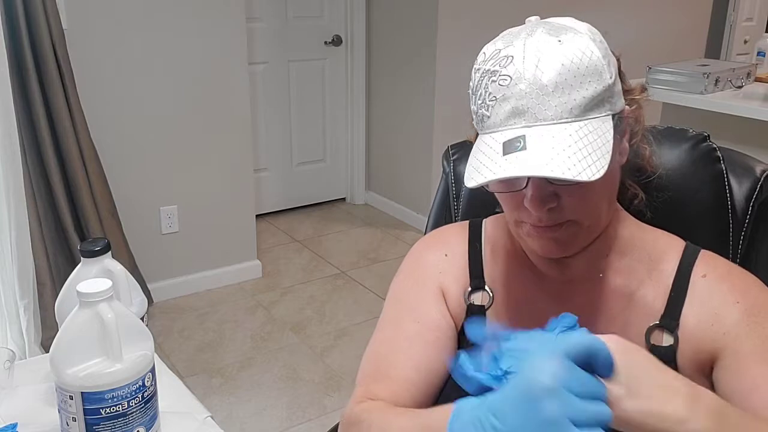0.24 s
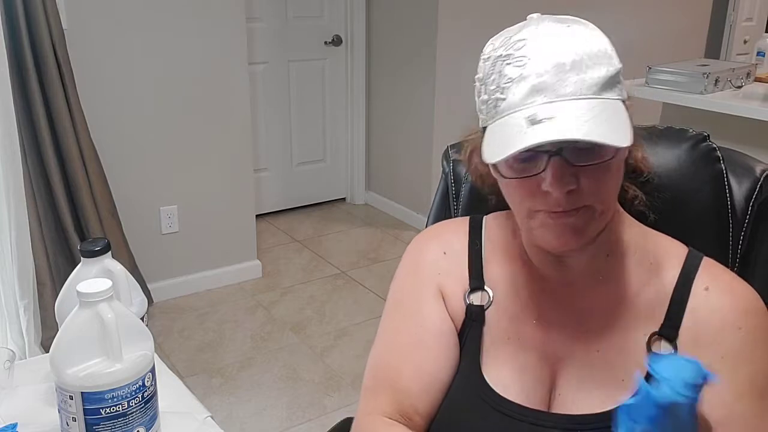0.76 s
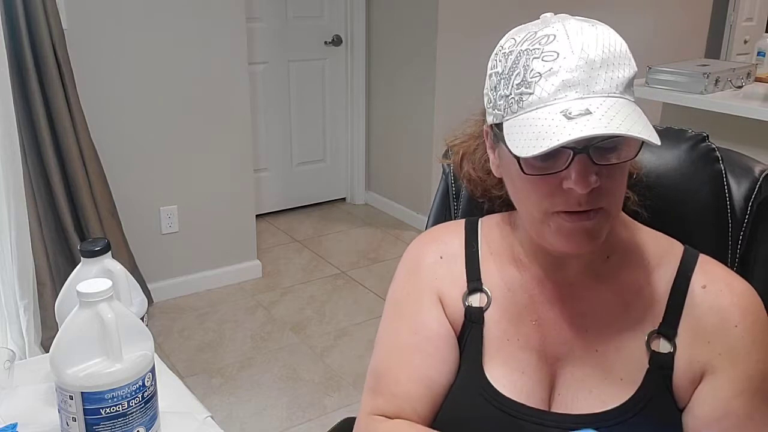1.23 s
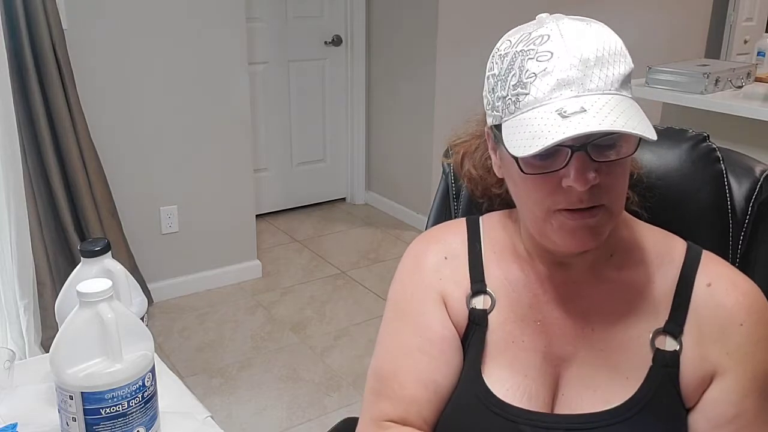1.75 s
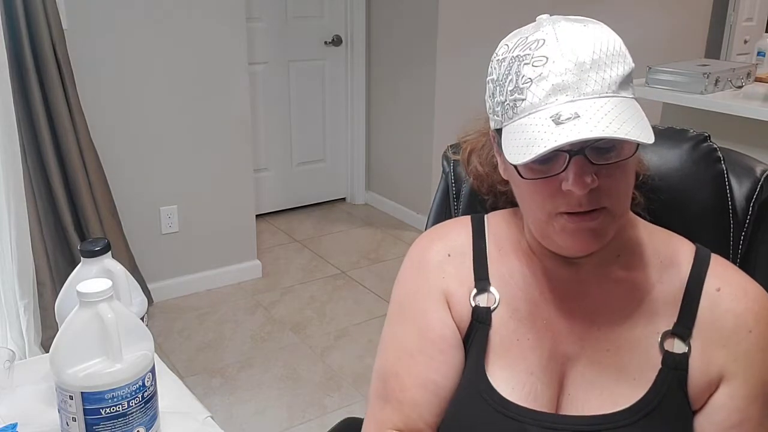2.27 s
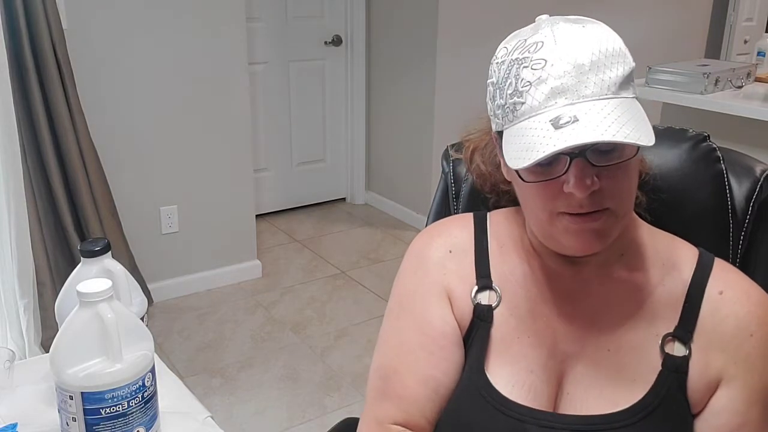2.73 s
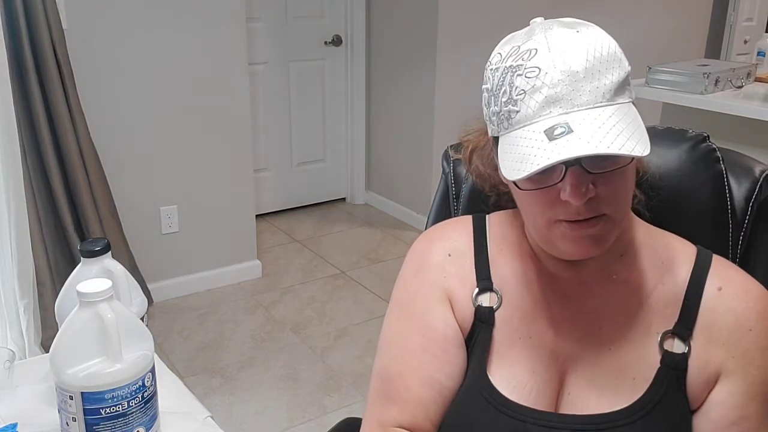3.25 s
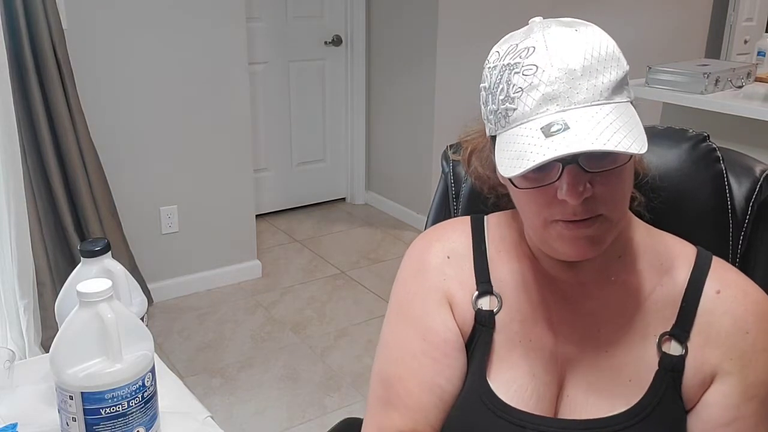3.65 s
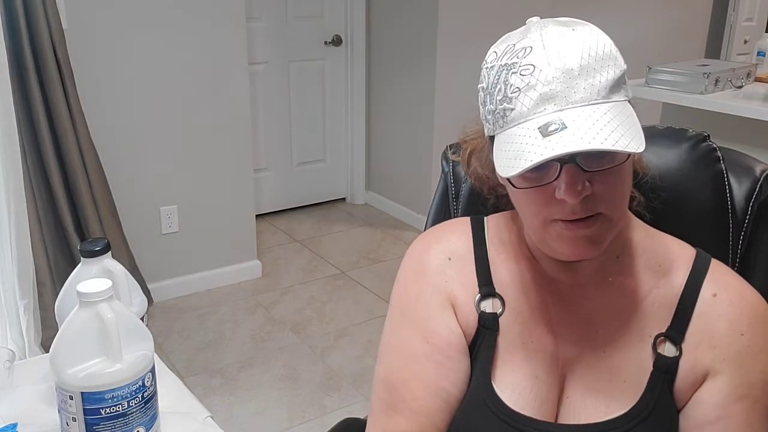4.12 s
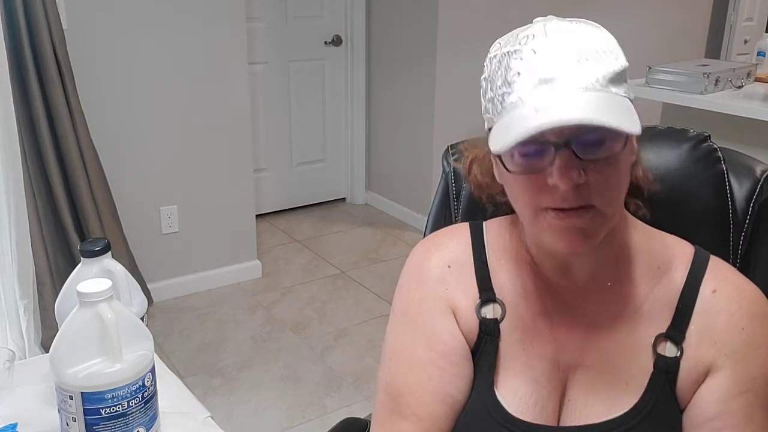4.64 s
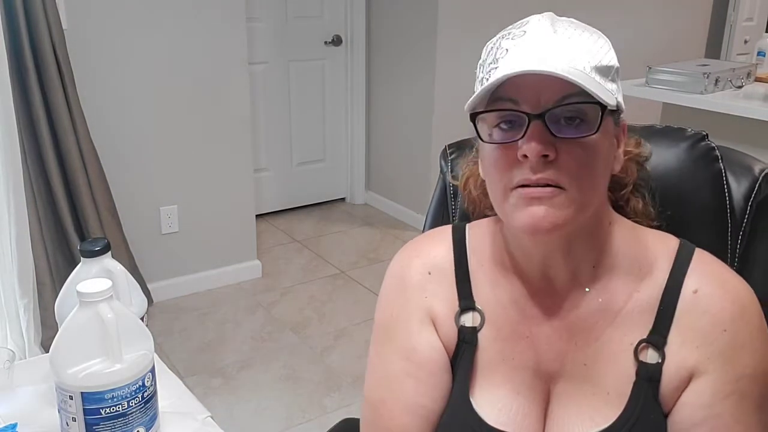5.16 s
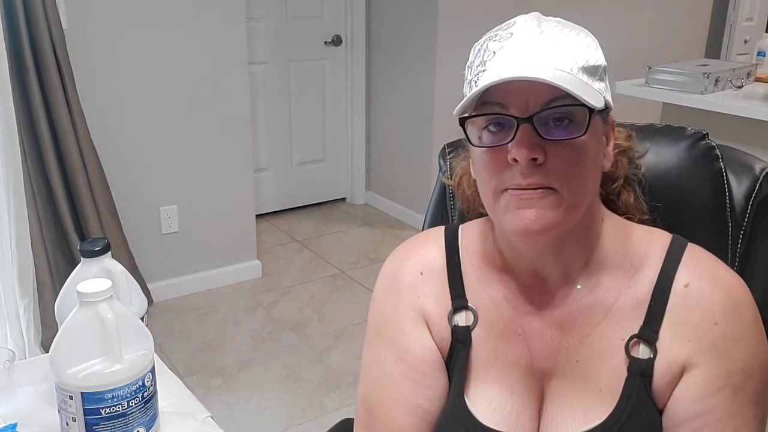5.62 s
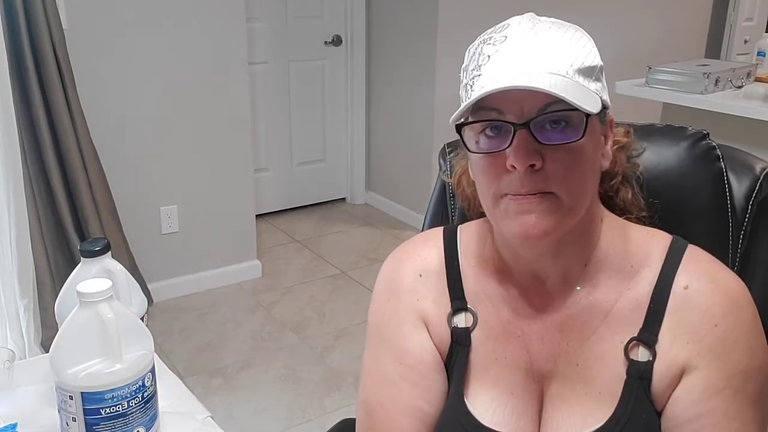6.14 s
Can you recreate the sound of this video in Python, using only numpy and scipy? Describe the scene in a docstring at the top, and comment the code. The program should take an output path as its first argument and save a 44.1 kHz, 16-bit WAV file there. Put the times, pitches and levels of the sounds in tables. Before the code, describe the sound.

Thin rubber gloves snap, crinkle and rub against skin in a quiet, slightly echoing tiled room, with a low motor hum growing behind.

```python
"""Rubber snaps on skin: thin gloves are worked onto the hands in a quiet room with a tiled floor.
Snaps are noise bursts ringing the film and the air under it; between them slips drive gliding resonances,
folds tick, narrow bands groan, a fingertip squeaks and the hands bump. Decaying noise makes the echoes.
Behind it, sines make a motor beyond the walls that mostly drops in pitch; noise makes air hiss and rumble."""
import sys
import numpy as np
from scipy import signal
from scipy.fft import rfft, irfft, next_fast_len
from scipy.io import wavfile

SR = 44100
rng = np.random.default_rng(int(sys.argv[2]) if len(sys.argv) > 2 else 0)


def dump(signal):
    """Clip the signal to [-1, 1] and save it as 16-bit WAV at the path in sys.argv[1]."""
    limited = np.clip(np.atleast_2d(signal).T, -1, 1)
    pcm = np.round(limited * 32767).astype(np.int16)
    wavfile.write(sys.argv[1], SR, pcm)


N = 281482
TIME = np.arange(N) / SR

# spectrum of the rubber film, only its shape counts: (frequency [Hz], density [dB per Hz])
FILM_SPECTRUM = [(500, -9.5), (900, -11.5), (1400, 4.5), (2200, -2), (3200, 2), (4800, 0.5), (6200, -6.5),
                 (9000, -13.5)]
# spectrum of cracks and crinkling folds, only its shape counts: (frequency [Hz], density [dB per Hz])
CRINKLE_SPECTRUM = [(3000, -15.5), (5200, -2), (6800, 4), (8600, 0), (10200, 3.5), (11600, 6), (13000, 3),
                    (14500, -2)]


def snaps(peel_db, peel_stretch, pocket_octaves, film_octaves, slap_db):
    """The film peels off, slaps down and settles; returns the direct sound and what goes into the room."""
    # rubber snapping on skin, levels are rms over 40 ms: (time [s], air pocket [dB], film [dB], crack [dB],
    # air pocket pitch [Hz], film pitch [Hz], room send [dB])
    snap_table = [(0.2923, -52, -45.5, -45.5, 920, 2730, -0.5), (0.347, -51, -50, -50, 730, 2500, -2),
                  (0.7535, -75, -48, -45.5, 1000, 4100, -4.5), (0.76, -65, -53, -52, 940, 3970, -6),
                  (0.7889, -63, -48.5, -40.5, 700, 3830, 2), (1.255, -95, -75.5, -64.5, 735, 2600, 0),
                  (1.3833, -83, -62, -52, 480, 2500, -9), (1.4425, -68, -58, -72, 900, 1920, -2),
                  (1.7519, -60.5, -56.5, -86, 634, 1730, -3.5), (1.9756, -79, -69.5, -87, 640, 1850, 3),
                  (2.1654, -68, -66, -76, 475, 1600, 0.5), (2.3569, -69, -58, -85, 580, 2290, -8),
                  (2.3679, -69, -61, -86, 650, 2630, -6), (2.376, -65.5, -58, -85, 577, 2340, -5),
                  (2.5235, -75, -67, -56, 710, 3370, -4), (2.9893, -45.5, -41.5, -42.5, 460, 2740, -9),
                  (3.1741, -76, -56.5, -72, 610, 3100, -12), (3.2581, -64, -60.5, -67, 890, 2570, 0),
                  (3.2637, -61, -58, -64, 970, 2550, -2), (3.297, -55, -61, -70, 810, 1600, -11),
                  (3.3302, -61, -60, -69, 600, 1980, -7), (3.4963, -52, -57, -74, 790, 1560, -1),
                  (3.5671, -48.5, -46.5, -49, 750, 1700, -3.5), (3.6641, -50, -55, -73, 735, 1760, -8),
                  (3.7099, -63, -46, -57, 468, 1430, -15), (3.724, -52.5, -46.5, -64, 462, 3130, 0),
                  (3.978, -76, -56, -68, 520, 4500, -3), (4.0101, -60, -50.5, -70, 789, 3460, -15),
                  (4.0657, -52, -60, -77.5, 806, 1867, -6), (4.212, -51, -48, -65, 650, 4000, -2),
                  (4.2433, -48, -44.5, -55, 470, 3600, -6.5), (4.4442, -69, -63.5, -55.5, 645, 2370, -4),
                  (4.5903, -52.5, -51, -58, 670, 2290, -5), (4.597, -54, -51.5, -84, 668, 3560, -2),
                  (4.8959, -64, -62.5, -64, 735, 2450, -14), (5.0119, -60.5, -67.5, -67, 836, 1510, -6),
                  (5.1836, -71, -62.5, -74, 880, 4600, -21), (5.198, -70, -58.5, -65, 850, 4770, -21),
                  (5.3322, -63, -63, -78, 930, 1900, -17), (5.4674, -49, -47.5, -56, 720, 4120, -6),
                  (5.6601, -72, -59, -73, 430, 1640, -8)]
    rise_steepness = 2.3  # a snap rises this many times faster than it falls
    decay_cycles = 2.1  # film cycles to fall to 1/e: the higher the pitch, the shorter
    lead_s = .008  # room for the rise ahead of the slap
    direct, sent = np.zeros(N), np.zeros(N)
    t = np.arange(SR // 25) / SR - lead_s
    from_slap = np.where(t < 0, -rise_steepness * t, t)
    click = signal.unit_impulse(len(t), int(lead_s * SR))
    for s, pocket_db, film_db, crack_db, pocket_hz, film_hz, room_db in snap_table:
        age = from_slap * film_hz / decay_cycles
        slap = np.exp(-age)
        peel = from_db(peel_db) * np.exp(-age / peel_stretch)
        # the crack comes mostly from the slap itself
        envelopes = [slap + peel, slap + peel / 2, slap + peel / 10]
        burst = rng.standard_normal((3, len(t))) * envelopes
        # the room gathers all directions, so the ragged burst reaches it as an even click
        routes = (direct, burst, 1), (sent, [click] * 3, from_db(room_db))
        for out, (low, mid, high), gain in routes:
            late_slap = coloured(np.roll(mid, SR // 4000), FILM_SPECTRUM)  # about 0.25 ms late
            ring = resonance(mid, film_hz, film_octaves)
            film = rms_one(ring + from_db(slap_db) * late_slap)
            snap = (from_db(pocket_db) * resonance(low, pocket_hz, pocket_octaves)
                    + from_db(film_db) * film
                    + from_db(crack_db) * coloured(high, CRINKLE_SPECTRUM))
            add(out, s - lead_s, gain * snap)
    return direct, sent


def rubbing(hollow_octaves, stretch_octaves, hand_db, scuff_db, sliding):
    """Slips drive the air pocket and the film together; tiny folds tick on top."""
    # spectrum of the hand's rub, only its shape counts: (frequency [Hz], density [dB per Hz])
    hand_spectrum = [(130, -59), (230, -15), (340, -0.5), (600, -3), (850, -1.5), (1300, -8), (2500, -30)]
    pocket_gain, film_gain, crinkle_gain, pocket_hz, film_hz = pulls()
    # smooth sliding fills the gaps between the slips
    drive = sliding + slips(per_s=115, unevenness=.45, spread_db=2.5, slip_ms=2.43)
    # the air pocket's pitch moves from pull to pull
    hand = coloured(drive * rng.standard_normal(N), hand_spectrum)
    hollow = rms_one(gliding(drive, pocket_hz, hollow_octaves) + from_db(hand_db) * hand)
    # so does the film's ringing pitch
    scuff = coloured(drive * rng.standard_normal(N), FILM_SPECTRUM)
    film = rms_one(gliding(drive, film_hz, stretch_octaves) + from_db(scuff_db) * scuff)
    crinkle = coloured(grains(per_s=2300, spread_db=3.5), CRINKLE_SPECTRUM)
    return pocket_gain * hollow + film_gain * film + crinkle_gain * crinkle


def pulls():
    """Each pull swells and lets go; the strongest sets the pitches. Returns three gains and two pitches."""
    # pulls dragging the rubber over the skin, levels at the tightest moment before the bass is thinned:
    # (tightest moment [s], rise [s], fall [s], air pocket [dB], film [dB], crinkle [dB],
    # air pocket pitch [Hz], film pitch [Hz])
    pull_table = [(0.11, 0.14, 0.12, -73, -69, -69, 745, 2420),
                  (0.255, 0.06, 0.053, -68, -64.5, -65, 800, 2600),
                  (0.35, 0.056, .12, -53, -53, -53.5, 700, 2680),
                  (0.48, 0.084, 0.1, -63, -59.5, -63.5, 376, 2810),
                  (0.615, 0.017, 0.11, -65, -61.5, -64, 595, 3940),
                  (0.83, 0.077, 0.1, -65, -54.5, -46.5, 605, 4000),
                  (1.125, 0.052, .09, -83, -77, -72, 400, 4600),
                  (1.27, 0.032, 0.11, -95, -68.5, -66, 600, 4250),
                  (1.36, 0.058, 0.12, -76, -62.5, -63, 540, 3070),
                  (1.44, 0.044, 0.099, -60, -56.5, -63, 840, 1900),
                  (1.565, 0.13, 0.19, -62.5, -59.5, -76, 686, 1820),
                  (1.757, 0.024, 0.073, -58, -55.5, -73, 580, 1800),
                  (1.815, 0.043, 0.065, -63.5, -63.5, -65, 403, 1840),
                  (2.005, 0.033, 0.1, -65, -73, -77, 382, 1850),
                  (2.184, 0.051, 0.068, -58.5, -63, -66, 453, 1537),
                  (2.39, .15, 0.11, -58.5, -58, -63, 575, 2500),
                  (2.487, 0.016, 0.018, -56.5, -53, -63, 630, 2750),
                  (2.602, 0.027, 0.11, -58, -54, -67.5, 790, 1780),
                  (2.725, 0.095, 0.21, -61.5, -59.5, -62.5, 548, 1940),
                  (2.977, 0.11, 0.11, -45, -48, -70, 635, 1650),
                  (3.025, 0.055, 0.039, -54, -49.5, -48, 640, 1600),
                  (3.14, 0.085, 0.058, -51.5, -51.5, -65, 590, 2290),
                  (3.33, 0.16, 0.089, -60.5, -63.5, -71, 556, 2070),
                  (3.46, 0.14, 0.071, -61, -62, -66.5, 720, 1970),
                  (3.518, 0.024, 0.19, -48, -49, -64, 780, 1600),
                  (3.72, 0.067, 0.029, -43.5, -41.5, -57, 464, 2170),
                  (3.88, 0.11, 0.059, -49.5, -53, -66, 534, 2030),
                  (4.02, 0.094, 0.15, -54, -55, -71, 640, 2570),
                  (4.22, 0.026, 0.062, -43.5, -51.5, -58, 527, 2900),
                  (4.28, 0.082, 0.082, -54.5, -52.5, -58, 366, 2250),
                  (4.44, 0.057, 0.061, -55, -57, -59, 506, 2310),
                  (4.56, 0.056, 0.14, -62, -59.5, -67.5, 595, 3360),
                  (4.795, 0.11, 0.043, -74, -60.5, -63, 720, 4200),
                  (4.93, 0.17, 0.18, -63, -63.5, -63.5, 698.3, 2370),
                  (5.21, 0.078, 0.21, -72.5, -61.5, -66.5, 830, 4740),
                  (5.315, 0.091, 0.071, -55.5, -59, -67, 844, 2130),
                  (5.424, 0.026, 0.025, -60, -64, -59.5, 650, 2600),
                  (5.5, 0.037, 0.21, -61.5, -57, -64.5, 900, 4600),
                  (5.67, 0.097, 0.11, -60, -61, -69.5, 380, 1720),
                  (5.9, 0.043, 0.14, -74.5, -66.5, -64, 740, 3870),
                  (5.989, 0.058, 0.061, -67.5, -72.5, -70, 698, 1690),
                  (6.205, 0.02, 0.25, -85, -70, -63, 600, 4270),
                  (6.253, 0.035, 0.091, -63.5, -67, -80, 610, 2260)]
    edge_db = -20.5  # level one rise before and one fall after the tightest moment
    roundness = 1.51  # 1 = pointed, 2 = rounded
    s, rise_s, fall_s, low_db, mid_db, high_db, pocket_hz, film_hz = np.transpose(pull_table)
    coarse = TIME[::44]  # a control value about every 1 ms
    since = coarse[:, None] - s
    age = np.maximum(-since / np.maximum(rise_s, .005), since / np.maximum(fall_s, .005))
    power = from_db(np.maximum(edge_db * age ** roundness, -200)) ** 2
    low, mid, high = [power * from_db(db) ** 2 for db in (low_db, mid_db, high_db)]
    gains = [np.sqrt(part.sum(axis=1)) for part in (low, mid, high)]
    # pitches averaged by power
    pitches = [part @ hz / part.sum(axis=1) for part, hz in ((low, pocket_hz), (mid, film_hz))]
    return [np.interp(TIME, coarse, control) for control in gains + pitches]


def thin(x, edge_hz):
    """A thin film radiates little bass."""
    return signal.sosfilt(signal.butter(4, edge_hz, "high", fs=SR, output="sos"), x)


def groans(width_hz, width_share, edge_db):
    """A run of slips rings one narrow resonance, sliding as the rubber moves; higher ones are damped more."""
    # tight rubber groaning as it slides, level at the loudest moment before the ends are faded:
    # (start [s], loudest [s], end [s], start pitch [Hz], end pitch [Hz], level [dB])
    groan_table = [(0.291, 0.304, 0.46, 895, 828, -51), (1.431, 1.453, 1.54, 2106, 1307, -60.5),
                   (1.521, 1.562, 1.61, 462, 498, -58.5), (1.591, 1.616, 1.73, 626, 573, -58),
                   (1.78, 1.81, 1.88, 473, 338, -56), (1.97, 1.98, 2.16, 1930, 1734, -66),
                   (2.16, 2.16, 2.25, 425, 464, -57), (2.37, 2.414, 2.49, 3030, 3250, -55.5),
                   (2.87, 2.976, 2.98, 777.4, 605.3, -41.5), (2.952, 2.975, 3.04, 499.4, 344.4, -42.5),
                   (3.377, 3.452, 3.56, 12600, 12500, -65), (3.86, 3.884, 3.94, 457, 425, -50.5),
                   (4.239, 4.28, 4.42, 326.3, 290.4, -53), (4.823, 4.866, 4.93, 636, 698, -56.5),
                   (5.161, 5.18, 5.3, 4970, 5460, -59.5), (6.226, 6.247, 6.31, 628, 606, -58.5)]
    out = np.zeros(N)
    drive = slips(per_s=100, unevenness=.3, spread_db=1.0, slip_ms=0.8)
    for start, loudest, end, start_hz, end_hz, db in groan_table:
        span = (TIME >= start) & (TIME < end)
        t = TIME[span]
        swell = from_db(db + np.interp(t, [start, loudest, end], [edge_db, 0, edge_db]))
        phase = 2 * np.pi * np.cumsum(np.geomspace(start_hz, end_hz, len(t))) / SR
        # slow noise on a gliding carrier is a gliding narrow band
        half_width_hz = max(width_hz, width_share * start_hz) / 2
        narrow = signal.butter(2, half_width_hz, fs=SR, output="sos")
        noise = drive[span] * rng.standard_normal((2, len(t)))
        cos_part, sin_part = signal.sosfilt(narrow, noise)
        band = rms_one(cos_part * np.cos(phase) + sin_part * np.sin(phase))
        out[span] += swell * signal.windows.tukey(len(t), 1 / 10) * band
    return out


def squeak(overtone_db, jitter):
    """A fingertip on the film slips very fast, nearly regularly: a short chirp with two overtones."""
    # one squeak, level before its fade in and out: (time [s], length [s], pitch [Hz], level [dB])
    squeak_settings = (1.378, .012, 2660, -43.0)
    s, length_s, hz, level_db = squeak_settings
    out, size = np.zeros(N), int(length_s * SR)
    phase = 2 * np.pi * np.cumsum(hz * (1 + jitter * drift(810)[:size])) / SR
    chirp = sum(from_db(overtone_db * k) * np.sin((k + 1) * phase) for k in range(3))
    add(out, s, from_db(level_db) * rms_one(chirp) * np.hanning(size))
    return out


def bumps(decay_s):
    """Soft, dull thuds of one hand on the other: bursts of low noise that die quickly."""
    # the hands bump together, level is rms over 1/8 s: (time [s], level [dB])
    bump_table = [(0.349, -63), (0.48, -66.5), (2.72, -67), (3.497, -63), (3.566, -62.5), (3.721, -47.5),
                  (4.065, -66), (4.24, -61.5), (4.589, -62.5), (4.894, -62), (5.317, -63.5), (5.66, -67)]
    # spectrum of a thud, only its shape counts: (frequency [Hz], density [dB per Hz])
    bump_spectrum = [(75, -14.5), (125, 0), (190, -1), (300, 0), (480, -23)]
    out, t = np.zeros(N), TIME[:SR // 8]
    for s, level_db in bump_table:
        burst = rng.standard_normal(len(t)) * np.exp(-t / decay_s)
        add(out, s, from_db(level_db) * coloured(burst, bump_spectrum))
    return out


def room(x, build_s, first_s, count=4):
    """The sound leaves ever different spots of the gloves, each with its own echoes."""
    spot = TIME * 100  # cycles through the spots, 100 a second
    out = np.zeros(N)
    for share in np.eye(count):
        from_spot = x * np.sqrt(np.interp(spot, np.arange(count), share, period=count))
        out += signal.fftconvolve(from_spot, room_tail(build_s, first_s))[:N]
    return out


def room_tail(build_s, first_s):
    """Diffuse echoes build up after the first reflection and die band by band; energy 1."""
    # the room's decay by 60 dB: (frequency [Hz], decay time [s])
    decay_times = [(150, 0.64), (400, 0.36), (900, 0.66), (3000, 0.56), (8000, 0.65), (13000, 0.4)]
    t, tail = TIME[:int(.8 * SR)], 0
    edges = np.geomspace(90, 16000, num=11)  # Hz
    for low, high in zip(edges, edges[1:]):
        band_pass = signal.butter(2, [low, high], "band", fs=SR, output="sos")
        band = signal.sosfilt(band_pass, rng.standard_normal(len(t)))
        tail = tail + band * from_db(-60 * t / at_hz(decay_times, np.sqrt(low * high)))
    tail = tail * (1 - np.exp(-np.maximum(t - first_s, 0) / build_s))
    return tail / np.linalg.norm(tail)


def motor(octave_db, waver_db):
    """A motor beyond the walls: a low hum with a faint octave, wavering at random in level."""
    # the hum's course, level of the fundamental before it wavers: (time [s], pitch [Hz], level [dB])
    motor_course = [(0, 104.7, -74.5), (1.55, 107.6, -74), (2.1, 104, -79.5), (2.85, 102.2, -70.5),
                    (3.0, 97.2, -70), (3.75, 97, -58.5), (4.3, 90.7, -65.5), (4.8, 89.6, -71.5),
                    (5.4, 88.3, -59), (5.75, 87.4, -65.5), (5.9, 84.2, -49), (6.02, 76.5, -53),
                    (6.38, 77.4, -51.5)]
    s, hz, db = np.transpose(motor_course)
    phase = 2 * np.pi * np.cumsum(np.interp(TIME, s, hz)) / SR
    gain = from_db(np.interp(TIME, s, db) + waver_db * drift(10))
    return gain * np.sqrt(2) * (np.sin(phase) + from_db(octave_db) * np.sin(2 * phase))


def background(air_db, heave_db, heaves_per_s):
    """Steady air hiss and a faint low rumble, perhaps from handling or a chair: two coloured noises."""
    # spectrum of the room's air, only its shape counts: (frequency [Hz], density [dB per Hz])
    air_spectrum = [(20, -12.5), (70, -6), (130, -15.5), (250, -18), (700, -35.5), (1500, -45), (4000, -28),
                    (9000, -34.5), (14000, -36)]
    # spectrum of the rumble, only its shape counts: (frequency [Hz], density [dB per Hz])
    rumble_spectrum = [(15, -19), (30, -12), (45, 1), (60, 9), (75, -1), (130, -11.5), (300, -45.5)]
    # the rumble's course before it heaves at random: (time [s], level [dB])
    rumble_course = [(0, -72), (0.35, -63), (0.95, -59.5), (1.1, -69), (1.6, -62.5), (2.2, -70),
                     (3.1, -62.5), (4.1, -62), (4.5, -65), (4.85, -59), (5.2, -69), (6.38, -57.5)]
    rumble_db = np.interp(TIME, *np.transpose(rumble_course)) + heave_db * drift(heaves_per_s)
    rumble = from_db(rumble_db) * coloured(rng.standard_normal(N), rumble_spectrum)
    air = from_db(air_db) * coloured(rng.standard_normal(N), air_spectrum)
    return rumble + air


def slips(per_s, unevenness, spread_db, slip_ms):
    """Stick-slip: rubber lets go at uneven intervals, each time in a short burst; an envelope of rms 1."""
    gaps, sizes = rng.standard_normal((2000, 2)).T
    at = (np.cumsum(np.exp(unevenness * gaps)) / per_s * SR).astype(int)
    kicks = np.zeros(N)
    kicks[at[at < N]] = from_db(spread_db * np.clip(sizes[at < N], -2, 2))
    decay = np.exp(-1000 / (slip_ms * SR))
    return rms_one(signal.lfilter([1], [1, -decay], kicks + 1e-18))


def grains(per_s, spread_db):
    """Random clicks, many small and a few large; rms 1."""
    sizes = from_db(spread_db * np.minimum(rng.exponential(1, N), 4))
    return rms_one(sizes * rng.choice([-1, 1], N) * (rng.random(N) < per_s / SR))


def resonance(x, hz, octaves):
    """A heavily damped resonance of the film or of the air trapped under it; rms 1."""
    edges = np.clip([hz * 2 ** (-octaves / 2), hz * 2 ** (octaves / 2)], 20, .45 * SR)
    return rms_one(signal.sosfilt(signal.butter(2, edges, "band", fs=SR, output="sos"), x + 1e-18))


def gliding(drive, centre_hz, octaves):
    """Noise under the envelope drive in a moving resonance, made by fading between neighbouring ones."""
    pitches = np.geomspace(centre_hz.min(), centre_hz.max(), num=8)
    out = np.zeros(N)
    for hz, share in zip(pitches, np.eye(len(pitches))):
        fade = np.sqrt(np.interp(centre_hz, pitches, share))
        out += fade * resonance(drive * rng.standard_normal(N), hz, octaves)
    return out


def coloured(x, spectrum):
    """Give x a spectrum through a causal (minimum-phase) filter; rms 1."""
    size = next_fast_len(len(x) // 2 + 1) * 2
    cepstrum = irfft(np.log(from_db(at_hz(spectrum, np.fft.rfftfreq(size, 1 / SR)))))
    # folding the cepstrum onto positive times makes the phase minimal
    cepstrum[1:size // 2] *= 2
    cepstrum[size // 2 + 1:] = 0
    return rms_one(irfft(rfft(x, size) * np.exp(rfft(cepstrum)))[:len(x)])


def at_hz(points, hz):
    """Read a table on a log-frequency axis."""
    knots, values = np.transpose(points)
    return np.interp(np.log(np.maximum(hz, 1)), np.log(knots), values)


def drift(rate):
    """Slow chance with rms 1, a new random value rate times a second."""
    knots = rng.standard_normal(int(N / SR * rate) + 2)
    return rms_one(np.interp(TIME * rate, np.arange(len(knots)), knots))


def add(out, s, sound):
    """Mix a sound in at time s."""
    start = max(round(s * SR), 0)
    out[start:start + len(sound)] += sound[:N - start]


def from_db(db):
    """Decibels to gain."""
    return 10 ** (np.asarray(db) / 20)


def rms_one(x):
    """Scale to rms 1."""
    return x / np.sqrt(np.mean(x ** 2) + 1e-20)


def scene():
    """Gloves and their echoes over the hum, the rumble and the room's air."""
    snap, snap_sent = snaps(peel_db=-3.0, peel_stretch=6.4, pocket_octaves=1.09, film_octaves=1.44,
                            slap_db=-15.5)
    rub = rubbing(hollow_octaves=0.85, stretch_octaves=1.19, hand_db=2.0, scuff_db=-0.5, sliding=.25)
    rub = thin(rub, edge_hz=210)
    groan = groans(width_hz=77, width_share=0.19, edge_db=-13.0)
    chirp = squeak(overtone_db=-1.5, jitter=0.057)
    thud = bumps(decay_s=0.0076)
    # the rustle spreads everywhere; sounds made between the hands reach the walls less
    sent = (from_db(-1.5) * snap_sent + from_db(-2.5) * rub
            + from_db(-7.5) * groan + from_db(-5.0) * (chirp + thud))
    echoes = room(sent, build_s=0.00017, first_s=0.001)
    gloves = snap + rub + groan + chirp + thud + echoes
    hum = motor(octave_db=-25.0, waver_db=1.2)
    quiet = background(air_db=-71.5, heave_db=2.5, heaves_per_s=9.5)
    return (gloves + quiet + hum)[None]


def record(dry):
    """One microphone channel whose top is cut steeply, by an elliptic low-pass at 14 kHz."""
    return signal.sosfilt(signal.ellip(10, .2, 70, 14000, fs=SR, output="sos"), dry)


dry = scene()
out = record(dry)
dump(out)
```